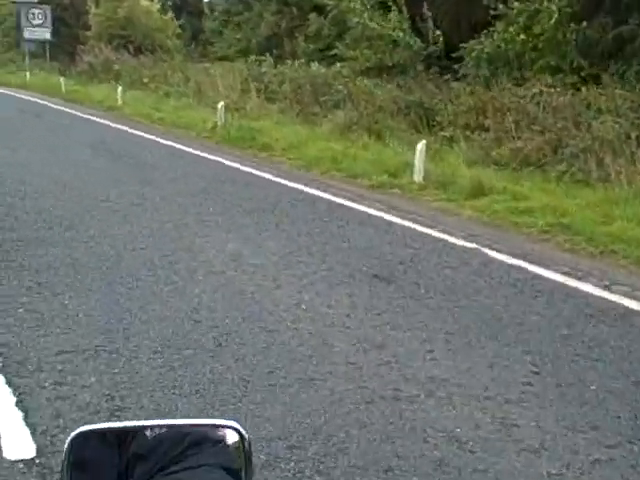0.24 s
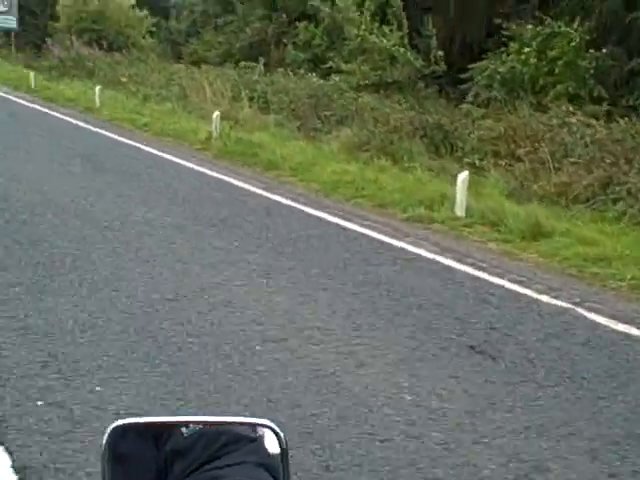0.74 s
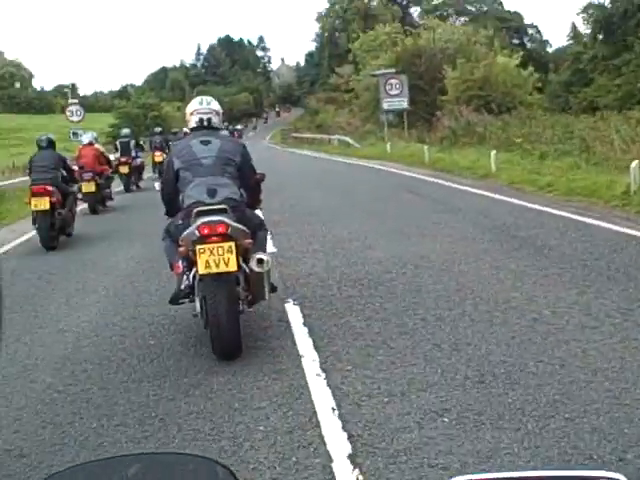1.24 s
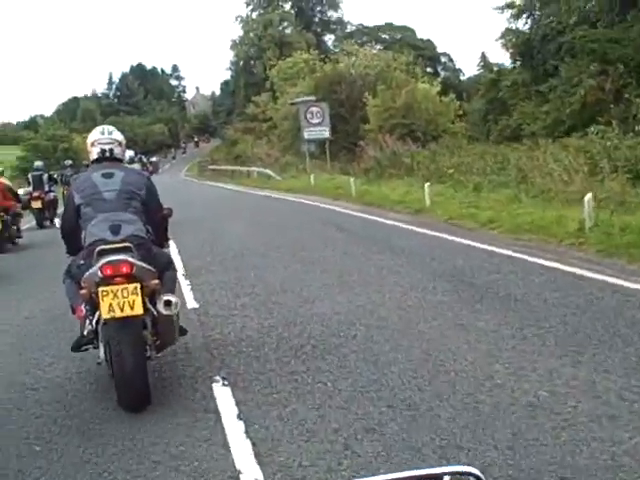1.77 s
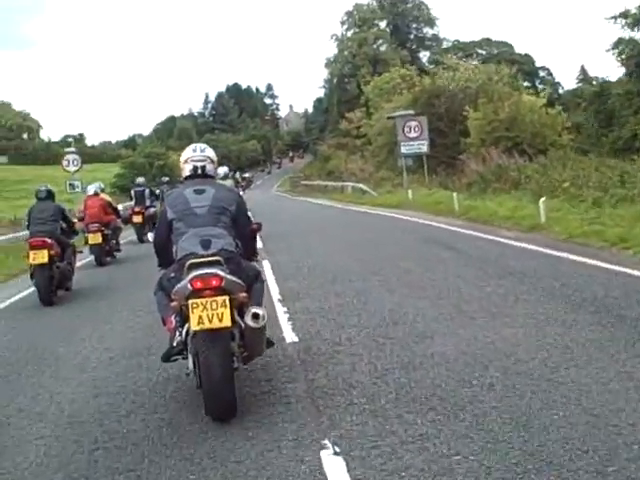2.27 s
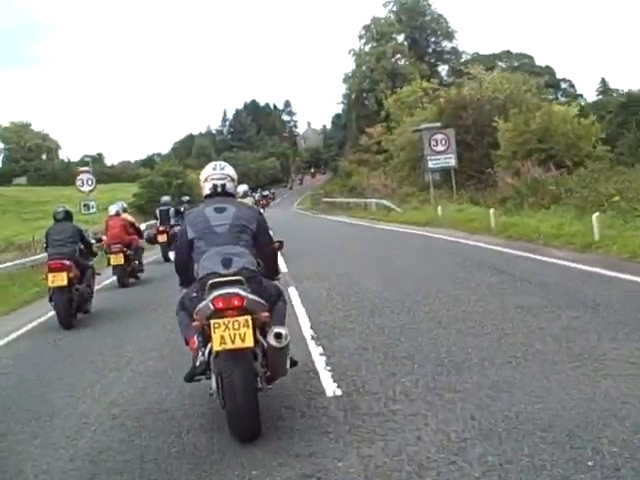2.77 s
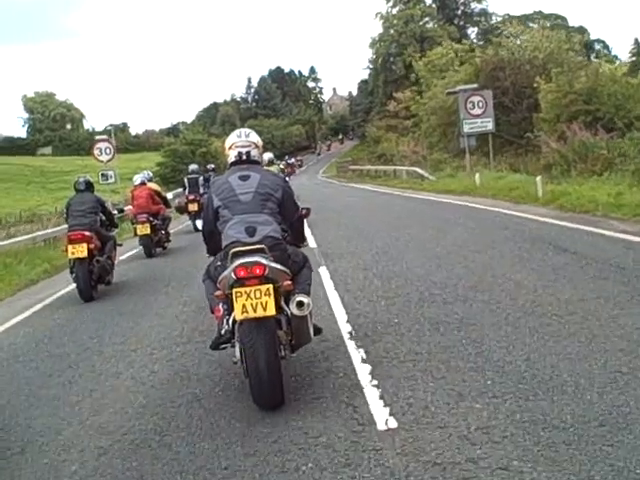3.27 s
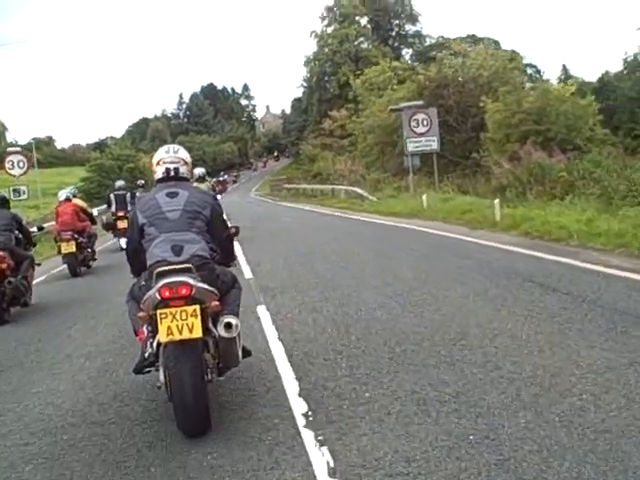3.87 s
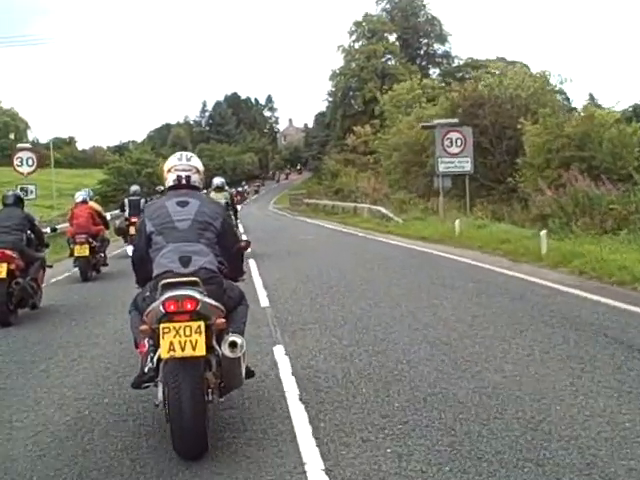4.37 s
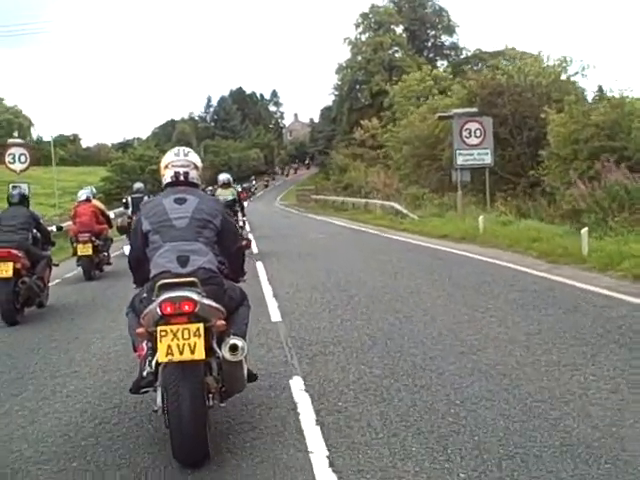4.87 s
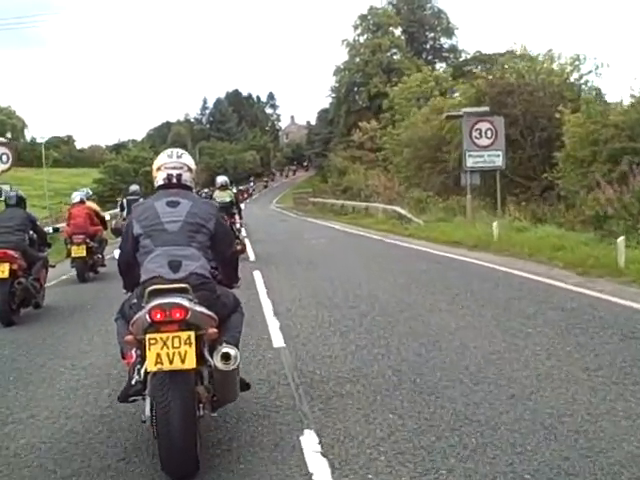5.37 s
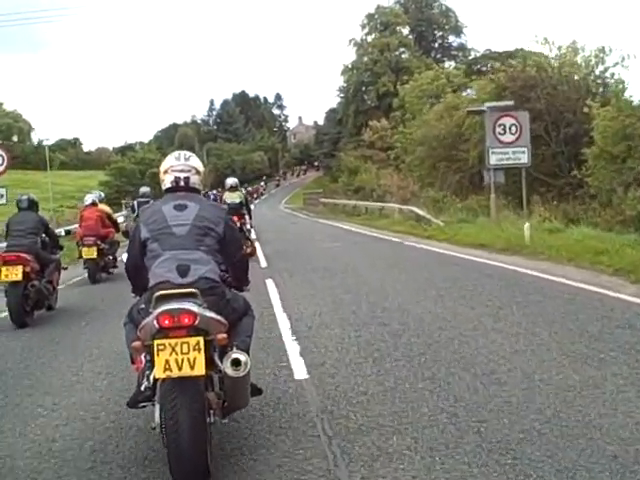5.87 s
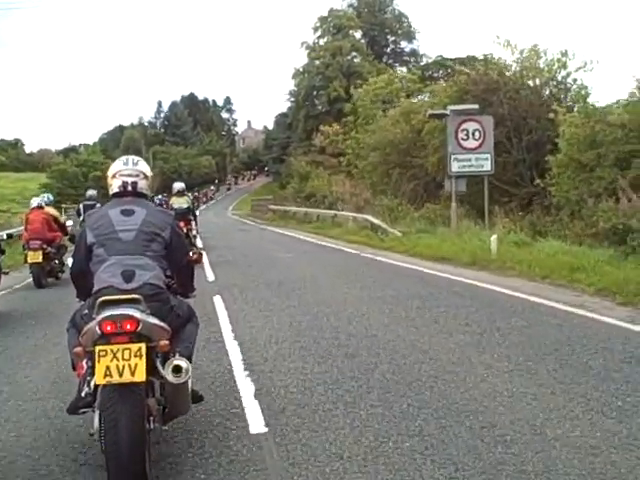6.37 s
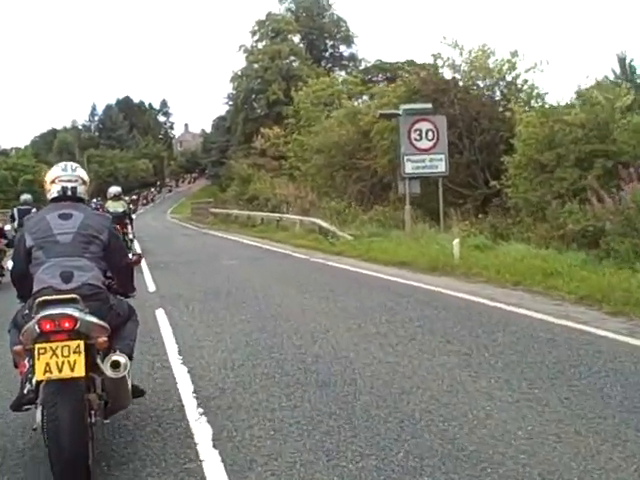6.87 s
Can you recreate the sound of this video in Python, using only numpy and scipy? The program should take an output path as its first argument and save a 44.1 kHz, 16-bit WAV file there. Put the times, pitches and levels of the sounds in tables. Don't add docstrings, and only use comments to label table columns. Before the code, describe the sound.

Heard from the saddle on a country road, a lumpy twin-cylinder motorcycle idles in close-paired pulses as a strap ticks brightly. A neighbour revs briefly, then the near engine growls through a long pull, settles and gives two loud blips that crackle the small microphone. Around it runs a low rumble of many crawling engines with a soft hiss of tyres and chains.

```python
import sys
import numpy as np
from scipy import signal
from scipy.io import wavfile
from scipy.ndimage import uniform_filter1d

SR = 44100
rng = np.random.default_rng(int(sys.argv[2]) if len(sys.argv) > 2 else 0)


def store_wav(level_fs):
    pcm = np.round(np.clip(np.atleast_2d(level_fs), -1, 1) * 32767)
    wavfile.write(sys.argv[1], SR, pcm.T.astype(np.int16))


def elevation(decibels):
    levels = np.asarray(decibels, float)
    return 10 ** (levels / 20)


N = 314433


def rms_one(x):
    return x / np.sqrt(np.mean(x ** 2) + 1e-20)


def in_time(rows):
    s, *columns = np.transpose(rows)
    return [np.interp(np.arange(N) / SR, s, c) for c in columns]


def filtered(x, order, hz, kind):
    return signal.sosfilt(signal.butter(order, hz, kind, fs=SR, output="sos"), x)


def drift(rate):
    r = np.exp(-80 * np.pi * rate / SR)
    white = rng.standard_normal(N // 40 + 4002)
    slow = signal.lfilter([1], [1, -2 * r, r * r], white)[4000:]
    return np.interp(np.arange(N) / 40, np.arange(len(slow)), rms_one(slow - slow.mean()))


def ring(x, hz, t60):
    r, w = elevation(-60 / (t60 * SR)), 2 * np.pi * hz / SR
    return signal.lfilter([0, np.sin(w)], [1, -2 * r * np.cos(w), r * r], x + 1e-18)


def swell(x, hz, t60):
    return ring(ring(x, hz, t60), hz, t60) * 2 * np.e * np.log(1000) / (t60 * SR)


def clicks_at(s, size):
    out = np.zeros(N)
    at = np.round(np.asarray(s) * SR).astype(int)
    inside = (at >= 0) & (at < N)
    np.add.at(out, at[inside], size[inside])
    return out


def firings(per_s):
    return np.diff(np.floor(np.cumsum(per_s / SR)), prepend=0)


def column(bright_db):
    # firings per s, speed drift as a share, unevenness in dB, level in dB, pipe in Hz, pipe t60 in s.
    engines = [(23.15, .1, 5.5, -7, 50.3, 0.081), (31.16, .1, 3, -3.5, 90.9, 0.08),
               (41.08, .08, 3.5, -2, 120.5, 0.04), (57.2, .07, 4, -5.5, 172, 0.032),
               (27.13, .1, 2, -8, 236.8, 0.031)]
    out = 0
    for per_s, wander, uneven_db, level_db, hz, t60 in engines:
        speed = per_s * (1 + wander * drift(.6) + .07 * drift(15))
        fired = firings(speed) * elevation(uneven_db * rng.standard_normal(N))
        roar = .22 * rng.standard_normal(N) * elevation(1.5 * drift(30))
        surge_db = .8 * drift(3.5) + bright_db * np.log2(hz / 100)
        out = out + elevation(level_db + surge_db) * rms_one(swell(rms_one(fired) + roar, hz, t60))
    return rms_one(out)


def hiss(tilt_db, patchy_db, clatter_db):
    # frequency in Hz, spectral density in dB per Hz.
    spectrum = [(180, -15), (300, -2), (478, -10), (900, -14.5), (1010, -19), (1120, -17), (1340, -22),
                (1750, -19), (2280, -20.5), (3640, -23.5), (7440, -36.5), (15000, -40.5), (16000, -43)]
    hz_at, db_at = np.transpose(spectrum)
    edges = 250 * 2 ** np.arange(0, 6.1, 1 / 3)
    white = rng.standard_normal((2, N))
    together, clatter = drift(28), drift(100)
    out = 0
    for k, (low, high) in enumerate(zip(edges, edges[1:])):
        band = filtered(white[k % 2], 2, [low, high], "band")
        high_share = k / len(edges)
        level_db = np.interp(np.log(low * high) / 2, np.log(hz_at), db_at) + high_share * tilt_db
        flicker_db = patchy_db * (0.55 * together + drift(4.8)) + clatter_db * high_share * clatter
        out = out + elevation(level_db + flicker_db) * band
    middle = filtered(out, 2, [1200, 6000], "band")
    return out / np.sqrt(np.mean(middle ** 2))


def chain(per_s):
    # mode of chain or valve gear in Hz, level in dB, t60 in s.
    modes = [(1110, -8, 0.0029), (1734, 5.5, 0.012), (2300, 3, 0.027), (3370, -5.5, 0.022)]
    sizes = elevation(3.2 * np.minimum(rng.exponential(1, N), 3.5)) * rng.choice([-1, 1], N)
    born = rng.random(N) < per_s / SR
    dealt = rng.integers(0, len(modes), N)
    out = 0
    for k, (hz, db, t60) in enumerate(modes):
        out = out + elevation(db) * ring(sizes * born * (dealt == k), hz, t60)
    return rms_one(out)


def throttle(speed):
    # opens in s, shuts in s, boom in dB, bark on opening in dB, bark on shutting in dB.
    openings = [
        (0.197, .24, 1.5, -11, -18),
        (1.36, 1.462, 3.5, -24, -2.5),
        (1.935, 2.35, 0, 0.5, 2),
        (2.38, 3.102, -2, -4, 2.5),
        (3.1, 3.866, -1.5, 3, 2.5),
        (4.78, 4.949, 0, 3, 5.5),
        (6.734, 6.863, 0.6, 8.5, 6),
    ]
    open_s, boom_fade_s, bark_fade_s = 0.04, 0.035, 0.13
    t = np.arange(N) / SR
    over = speed - 10.2
    boom_db = -7 + 0.79 * over
    bark_db = -11.5 + .6 * over
    for opens, shuts, open_db, first_db, last_db in openings:
        rise = 1 + (t - opens) / open_s
        boom_share = np.clip(np.minimum(rise, 1 + (shuts - t) / boom_fade_s), 0, 1)
        bark_share = np.clip(np.minimum(rise, 1 + (shuts - t) / bark_fade_s), 0, 1)
        boom_db = boom_db + boom_share * (open_db + 0.56 * over - boom_db)
        bark_db = bark_db + bark_share * (np.interp(t, [opens, shuts], [first_db, last_db]) - bark_db)
    return boom_db, bark_db


def body_rattle(bark_db):
    knee_db = 5
    rattle_db = -46 + 0.23 * bark_db + 1.9 * np.maximum(bark_db - knee_db, 0)
    shaking = elevation(uniform_filter1d(rattle_db, size=SR // 16) + 1.3 * drift(60))
    return shaking * filtered(rng.standard_normal(N), 1, [2500, 15000], "band")


def twin():
    # time in s, four-stroke cycles per s.
    crank = [(0.0, 10.46), (1.3, 10.17), (1.37, 12.63), (1.79, 9.06), (2.1, 15.2), (2.36, 12.56),
             (2.41, 12.29), (3.44, 14.9), (3.9, 15.77), (4.08, 11.61), (4.75, 10.62), (5.01, 24.82),
             (5.58, 14.06), (5.88, 10.83), (6.65, 10.08), (6.81, 19.9), (6.92, 20.15), (7.13, 8.0)]
    # time in s, change in dB.
    odd_firings = [(2.228, -0.5), (4.79, -1.5), (4.804, 0.5), (4.87, 3), (4.911, 2.5), (5.012, 0),
                   (5.042, -3), (5.053, -2), (6.728, -0.5), (6.743, 0.5), (6.849, -9), (6.9, -1)]
    # time in s, level in dB.
    thumps = [(0.512, 1), (0.598, -5), (.789, 2), (0.9, 1.5), (1.092, -0.5), (1.169, -16), (4.000, 1),
              (4.331, 2.5), (4.429, 0.5), (4.608, 3), (5.194, -1), (5.279, -5), (5.511, 3.5), (5.649, 2),
              (5.792, -0.5), (5.895, 2), (6.260, -2), (6.373, 2.5), (6.471, 0.5)]
    # frequency in Hz, height, t60 in s.
    boom_modes = [(109, .32, .035), (77, .085, .061)]
    # frequency in Hz, height, t60 in s.
    bark_modes = [(260, -.14, .029), (361, .065, .02), (147, -.32, .008)]
    # frequency in Hz, level in dB, t60 in s.
    crack_modes = [(456, -27, 0.015), (679, -34, 0.013), (875, -37, 0.01), (1250, -45, 0.0048),
                   (1990, -42.5, 0.0031)]
    boom_lag_s, crack_lag_s = .0036, 0.0013

    speed, = in_time(crank)
    t = np.arange(N) / SR
    cycles = -.134 + np.cumsum(speed) / SR
    firing = (np.arange(-1, 94)[:, None] + [0, .245]).ravel()
    at = np.interp(firing, cycles, t, left=-1, right=-1)
    luck = rng.standard_normal((len(firing), 2))

    boom_curve, bark_curve = throttle(speed)
    smooth_db = np.interp(at, t, boom_curve)
    bark_over_boom_db = np.interp(at, t, bark_curve) - smooth_db
    uneven_db = np.clip(.7 - .45 * smooth_db, .3, 5)
    blow_db = smooth_db + uneven_db * luck[:, 0]
    for odd_s, odd_db in odd_firings:
        blow_db[np.argmin(np.abs(at - odd_s))] += odd_db

    boom = clicks_at(at + boom_lag_s, elevation(blow_db))
    bark = clicks_at(at, elevation(blow_db + bark_over_boom_db + .6 * luck[:, 1]))
    crack = clicks_at(at + crack_lag_s, elevation(1.91 * blow_db + bark_over_boom_db + luck[:, 1]))
    thump_s, thump_db = np.transpose(thumps)
    boom += clicks_at(thump_s + boom_lag_s, elevation(thump_db))
    bark += clicks_at(thump_s, elevation(thump_db - 10.5))

    out = sum(height * swell(boom, hz, t60) for hz, height, t60 in boom_modes)
    out += sum(height * swell(bark, hz, t60) for hz, height, t60 in bark_modes)
    out += sum(elevation(db) * swell(crack, hz, t60) for hz, db, t60 in crack_modes)
    lag = round(0.027 * SR)
    out[lag:] += elevation(-23.0) * out[:-lag]
    return out + body_rattle(bark_curve)


def ticks():
    # time in s, peak in dB, ring in Hz, crack over ring in dB.
    slaps = [(0.0174, -26, 6320, -5), (0.105, -26, 7100, 8), (0.194, -26, 7290, 10), (0.2864, -34, 7000, 2),
             (0.358, -20, 7100, -1), (0.4788, -20, 9200, 0), (0.5194, -23, 7040, -3),
             (0.7854, -25, 7190, -3), (0.8006, -25, 6140, -11), (0.813, -23, 6150, -1),
             (0.8234, -34, 6200, -3), (0.829, -24, 9500, 4), (0.839, -27, 7120, -5),
             (0.8694, -26, 11000, 7), (0.8734, -24, 6360, -3), (0.892, -13, 7100, 7.5),
             (3.9379, -23, 6380, -3), (6.5316, -28, 6650, -15)]
    out = 0
    for s, db, hz, crack_db in slaps:
        click = clicks_at([s], elevation(np.array([db])))
        out = out + elevation(crack_db) * click + 0.7 * ring(click, hz, 0.002)
    return filtered(out, 2, 2500, "high")


def orders(passages):
    out, t = 0, np.arange(N) / SR
    for rows in passages:
        hz, *orders_db = in_time(rows)
        to_end_s = np.minimum(t - rows[0][0], rows[-1][0] - t)
        fade = np.clip(to_end_s / 0.094, 0, 1)
        turn = 2 * np.pi * np.cumsum(hz * (1 + 0.01217 * drift(8.5))) / SR
        for k, db in enumerate(orders_db):
            level = elevation(db + 3 * drift(8.9))
            out = out + np.sqrt(2) * fade * level * np.sin((k + 1) * turn)
    return out


def steady_fours():
    # time in s, firing tone in Hz, level in dB.
    passages = [
        [(.4, 234, -34), (.9, 230, -33), (1.3, 226, -32), (1.55, 220, -32)],
        [(3.55, 200, -33), (3.9, 205, -31), (4.1, 213, -31), (4.4, 219, -31), (4.7, 214, -31), (4.95, 211, -30)],
        [(5.45, 178, -33), (5.7, 203, -30), (5.95, 236, -31)],
    ]
    return orders(passages)


def neighbour():
    # time in s, firings per s, level in dB.
    rev = [(1.25, 42.5, -55), (1.35, 43.5, -40), (1.4, 46.5, -14.5), (1.47, 45, -18.5), (1.51, 41.5, -41),
           (1.6, 44, -58)]
    # pipe resonance in Hz, level in dB, t60 in s.
    pipe_modes = [(125, -0.5, 0.027), (185.5, -1.5, 0.044), (270, -11, 0.039), (435, -8, 0.014)]
    per_s, level_db = in_time(rev)
    fired = firings(per_s) * elevation(2 * rng.standard_normal(N))
    pipe = 0
    for k, (hz, db, t60) in enumerate(pipe_modes):
        pipe = pipe + (-1) ** k * elevation(db) * swell(fired, hz, t60)
    return elevation(level_db) * rms_one(pipe)


def slow_twins():
    # time in s, first order in Hz, first order in dB, second order in dB.
    passages = [
        [(1.35, 46, -28, -37), (1.6, 47.44, -21.5, -31), (1.9, 52.13, -25, -17), (2.15, 53.65, -30, -30),
         (2.4, 56, -30, -36)],
        [(4.4, 50.8, -23, -31), (4.65, 55.4, -30, -35), (5.0, 67.47, -23, -25.5), (5.2, 62.8, -16.5, -33),
         (5.45, 51.7, -17.5, -18), (5.7, 61.84, -27, -25.5), (6.0, 55.5, -18, -31)],
    ]
    return orders(passages)


def panel_buzz():
    # time in s, peak in dB.
    squeaks = [(4.9254, -41), (4.9372, -48), (4.9494, -46), (4.9836, -47), (6.8174, -39), (6.8264, -43)]
    s, db = np.transpose(squeaks)
    return swell(clicks_at(s, elevation(db)), 7900, 0.011)


def scene():
    # time in s, level in dB, brightness in dB per octave.
    nearness = [(0, -15.5, -2.5), (1.3, -17, -0.2), (2.18, -17, 1), (2.6, -15, -0.5), (3.8, -14, -5),
                (4.35, -17, -0.4), (5.0, -16.5, 0), (5.4, -14, 0), (5.75, -20.5, 1.6), (6.2, -19, 0.3),
                (6.7, -14, -5.5), (7.13, -11.5, -3.2)]
    # time in s, level in dB, treble tilt in dB.
    road = [(0, -39, -2), (.8, -39, -5.5), (1.4, -40.5, -0.5), (3.6, -39, 0.5), (4.3, -41.5, -0.5),
            (5.3, -39, -1.5), (5.9, -42, 4), (6.4, -41, 2), (7.13, -38.5, -3)]
    column_db, bright_db = in_time(nearness)
    hiss_db, tilt_db = in_time(road)
    machinery = hiss(tilt_db, patchy_db=0.62, clatter_db=2.5) + elevation(-10) * chain(per_s=200)
    around = elevation(column_db - 0.82) * column(bright_db) + elevation(hiss_db) * machinery
    near = twin() + ticks() + panel_buzz()
    others = steady_fours() + neighbour() + slow_twins()
    return (around + near + others)[None]


def low_pass(x):
    return signal.sosfilt(signal.butter(12, 15740, fs=SR, output="sos"), x)


def record(dry):
    # overload in s, gain change in dB.
    overloads = [
        (4.91, -4),
        (6.79, -3),
    ]
    clip_level = .71
    thin = filtered(dry, 4, 36, "high")
    steps = np.cumsum([0, 0.13, 0.34, 0.41])
    t = np.arange(N) / SR
    gain_db = sum(np.interp(t, s + steps, [0, db, db, 0]) for s, db in overloads)
    clipped = np.clip(thin * elevation(gain_db), -clip_level, clip_level)
    mix = signal.sosfilt(signal.ellip(10, .2, 60, 15720, fs=SR, output="sos"), clipped)
    return low_pass(mix)


dry = scene()
out = record(dry)
store_wav(out)
```